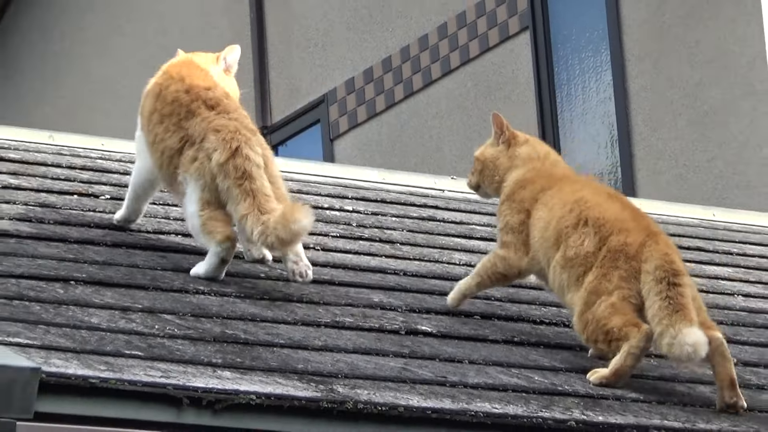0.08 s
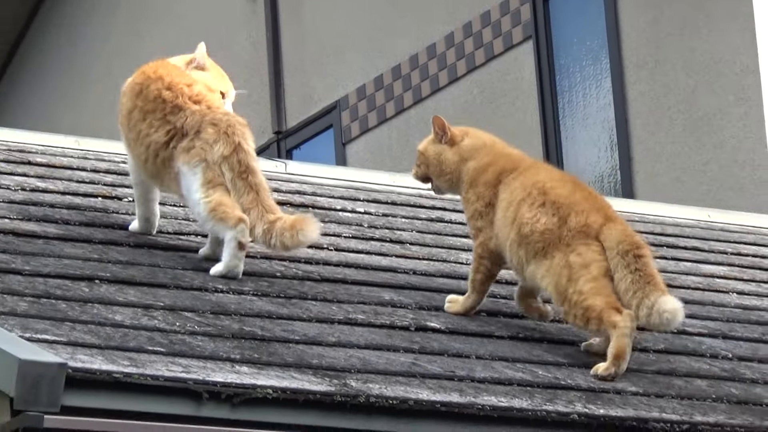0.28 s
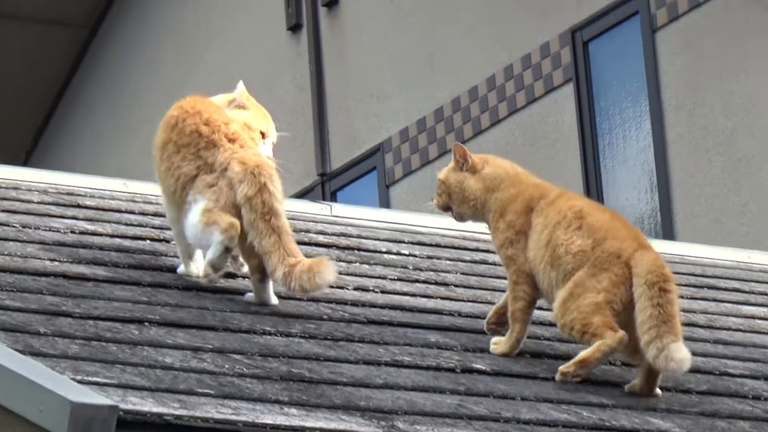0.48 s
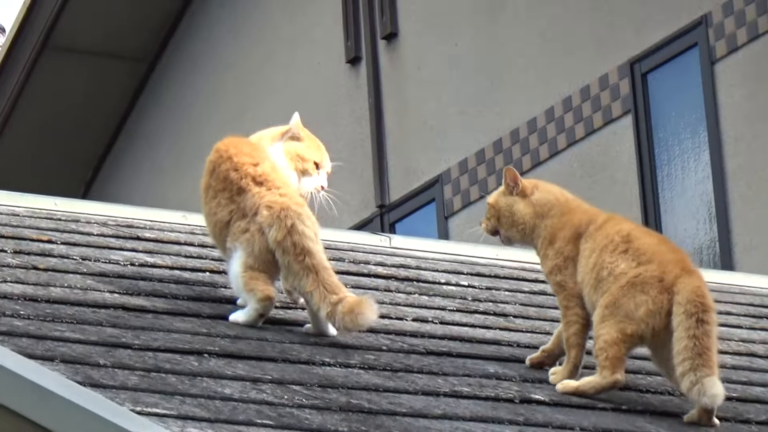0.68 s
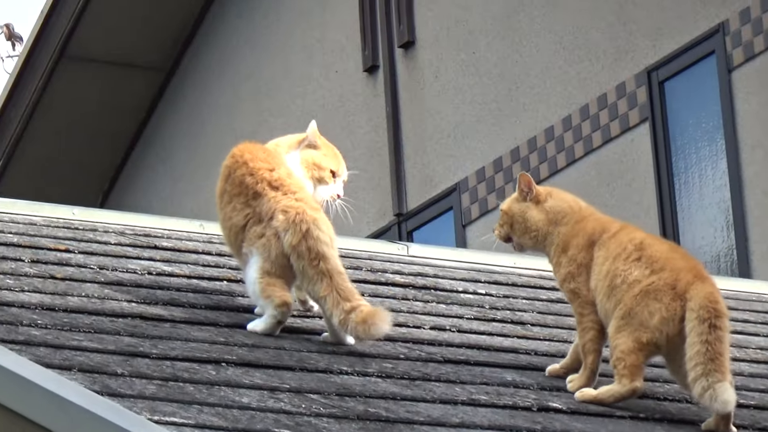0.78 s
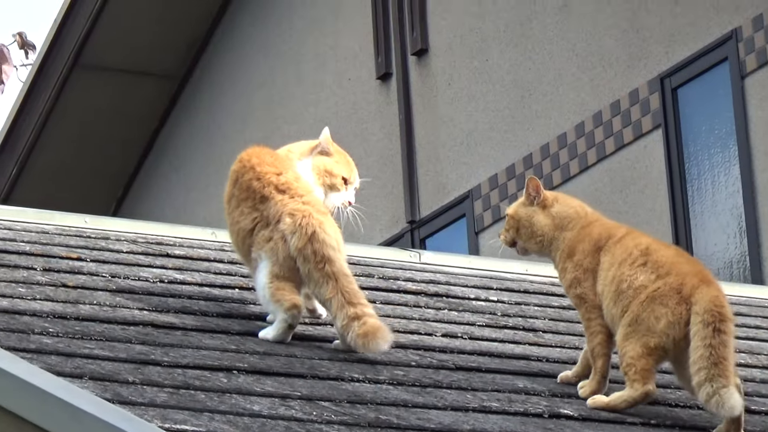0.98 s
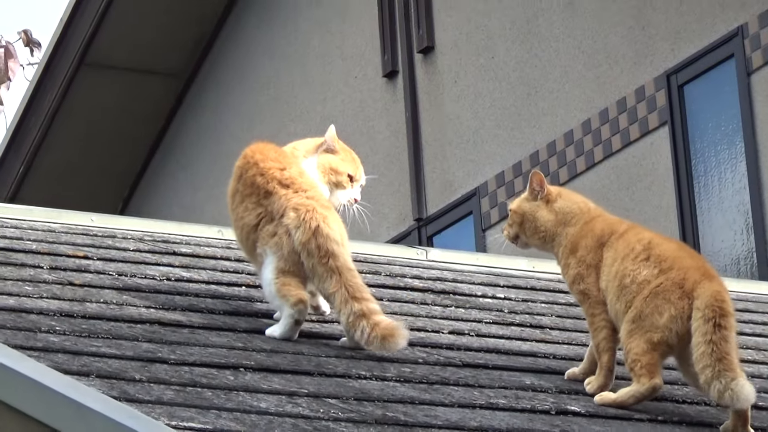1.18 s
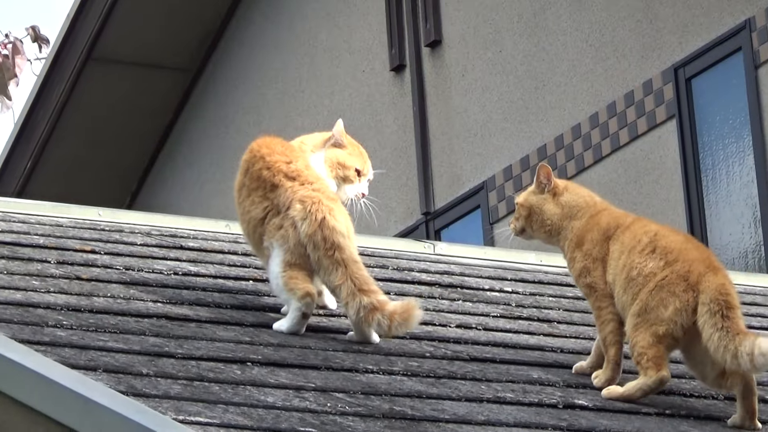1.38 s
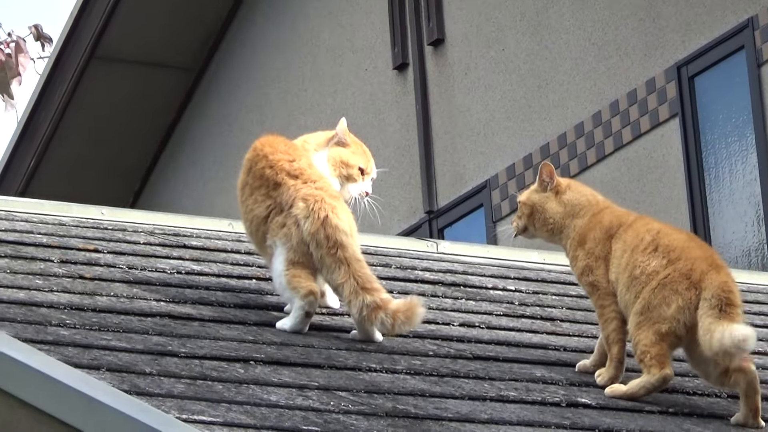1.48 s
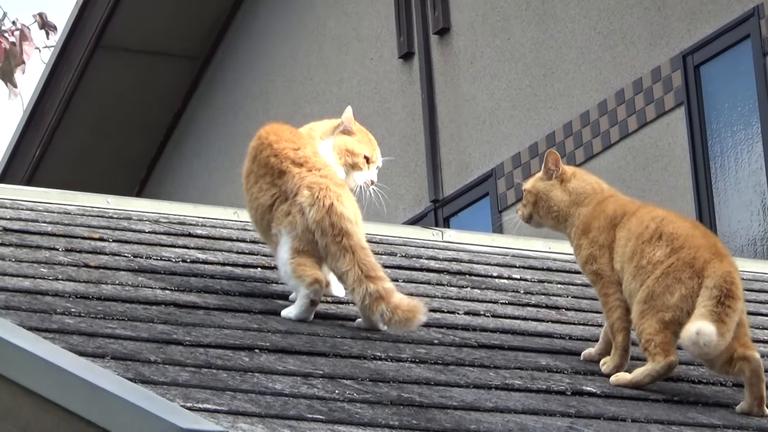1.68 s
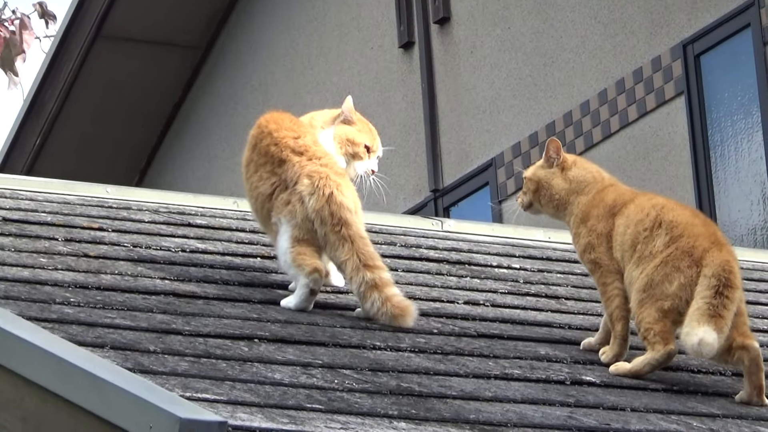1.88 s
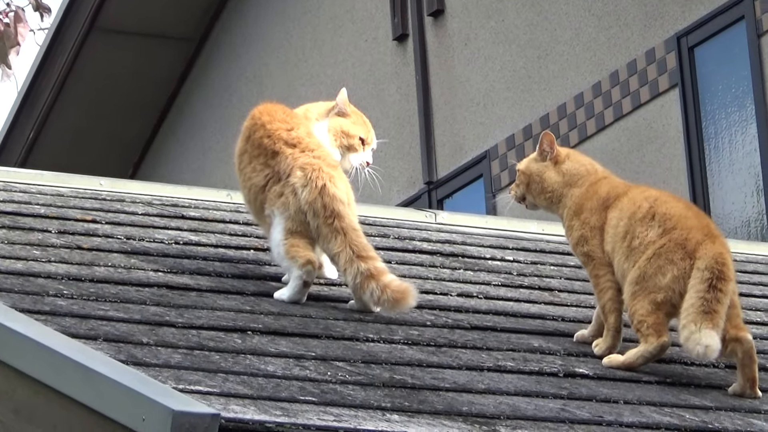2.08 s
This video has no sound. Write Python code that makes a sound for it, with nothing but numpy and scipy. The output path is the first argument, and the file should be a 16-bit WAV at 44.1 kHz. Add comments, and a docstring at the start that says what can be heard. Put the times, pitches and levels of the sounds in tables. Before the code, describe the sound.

A cat yowls once, loud and nasal, leaping up from a rough start, holding steady, then sagging to a brief hum. A faint claw tick precedes it; roof and wall echo it over quiet town murmur.

```python
"""A cat on a tiled roof yowls once at a rival: a harmonic series shaped by throat and mouth resonances.
The pitch leaps up, holds and sags as the mouth closes; a closed-mouth hum ends the call.
A second tone and a noise rasp join its rough start; a claw, a short noise burst, ticks on a tile before it.
Discrete reflections and a diffuse tail echo all of this off roof, wall and yard.
Behind, unechoed: shaped noise for the town's murmur, far traffic and a soft high rustle."""
import sys
import numpy as np
from scipy import signal
from scipy.fft import rfft, irfft
from scipy.io import wavfile

SR = 44100
rng = np.random.default_rng(int(sys.argv[2]) if len(sys.argv) > 2 else 0)


def generate_wav(signal):
    """Clip the signal to [-1, 1] and save it as 16-bit WAV at the path in sys.argv[1]."""
    frames = np.transpose(np.atleast_2d(signal))
    scaled = np.clip(frames, -1, 1) * 32767
    pcm = np.round(scaled).astype(np.int16)
    wavfile.write(sys.argv[1], SR, pcm)


N = 92610


def amp(db):
    """Decibels to gain."""
    return 10 ** (np.asarray(db) / 20)


def unit(x):
    """Scale to rms 1."""
    return x / np.sqrt(np.mean(x ** 2))


def curves(table):
    """Each column after time_s, joined by straight lines in time."""
    time_s, *columns = np.array(table, float).T
    return [np.interp(np.arange(N) / SR, time_s, column) for column in columns]


def colour(table, hz):
    """Second column of a table, read on a log-frequency axis."""
    table_hz, level_db = np.array(table, float).T
    return np.interp(np.log(hz + 1), np.log(table_hz), level_db)


def noise(gain):
    """Noise with a gain for each frequency, rms 1."""
    spectrum = rfft(rng.standard_normal(N))
    return unit(irfft(spectrum * gain(np.fft.rfftfreq(N, 1 / SR)), N))


def resonant(bands):
    """Noise through parallel resonances, rms 1; band levels are relative."""
    def gain(f):
        return sum(amp(level_db) / np.sqrt(width_hz) / (1 + ((f - centre_hz) / width_hz * 2) ** 2)
                   for centre_hz, width_hz, level_db in bands)
    return noise(gain)


def walk(rate_hz):
    """Smooth random motion up to about rate_hz, rms 1."""
    return noise(lambda f: 1 / (1 + (f / rate_hz) ** 4))


def gate(table, attack_s=0.015, release_s=0.012):
    """Opens from a table's first time, closes after its last."""
    t = np.arange(N) / SR
    opening = np.clip((t - table[0][0]) / attack_s, 0, 1)
    closing = np.clip(1 - (t - table[-1][0]) / release_s, 0, 1)
    return opening * closing


def spread(mid, side, width):
    """Left and right from a shared and an opposed part."""
    return mid + width * side * np.array([[1], [-1]])


# vocal folds: time_s, pitch_hz
FOLD_PITCH = [(.17, 355), (.19, 413), (.21, 525), (.235, 607.6), (.26, 676.6), (.3, 732), (.345, 761.8),
              (.385, 781.3), (.42, 769.7), (.48, 778.9), (.53, 779.9), (.61, 771), (.69, 766.8), (.76, 753),
              (.84, 731), (.92, 711.3), (1.025, 698.7), (1.055, 689.3), (1.11, 688.5), (1.18, 664),
              (1.2, 655.6), (1.22, 653), (1.25, 622.6), (1.285, 593.6), (1.3, 586.5)]
# fold unsteadiness: time_s, roughness (0-1)
FOLD_ROUGHNESS = [(.17, .45), (.28, .35), (.38, .1), (.5, .04), (1.15, .04), (1.3, .12)]
# fold harmonics from the fundamental up: strength_db
FOLD_HARMONICS = [2.5, 4, 3.5, 1.5, -11.5, -1, -5.5, -2, -3.5, 0, -7, 0.5, -13, 1.5, -2, 0, -5, 1]
# fixed throat colour: freq_hz, level_db
THROAT_COLOUR = [(400, -8), (750, -4), (1100, 0), (1500, 0), (2300, -10), (3000, -9), (3600, -18),
                 (4150, -17), (4650, -12), (5200, -19), (6500, -20), (8500, -26), (11000, -29),
                 (12500, -34), (14000, -44)]
# effort and mouth: time_s, level_db, lower_hz, upper_hz, top_hz, treble_db
MOUTH_SHAPE = [(.172, -60, 1420, 2080, 7560, 19), (.198, -41.5, 1605, 2170, 7600, -8.5),
               (.235, -35.5, 1820, 2800, 7500, -6), (.28, -31, 2028, 2530, 7500, -3.5),
               (.325, -32.5, 2170, 2470, 7500, 0), (.37, -31, 2178, 2600, 9250, -0.5),
               (.45, -29, 2194, 2690, 9730, 2), (.56, -30, 1988, 2480, 10150, 2),
               (.7, -28.5, 1970, 2730, 9580, 3), (.82, -27.5, 1962, 2690, 9240, -0.5),
               (.94, -31, 1656, 2800, 8600, 1), (1.1, -31.5, 1610, 2645, 8280, 0.5),
               (1.2, -36.5, 1400, 2650, 8000, 2.5), (1.275, -38, 1210, 2450, 7700, 0.5),
               (1.3, -41, 1160, 2386, 7540, 1)]
LOWER_WIDTH_HZ, UPPER_WIDTH_HZ, TOP_WIDTH_HZ = 224, 221, 226
LOWER_PEAK_DB, UPPER_PEAK_DB, TOP_PEAK_DB = 15.5, 10, 8.5
WAVER, JITTER = 0.00076, 0.0067  # rms fractions of pitch; jitter at roughness 1
SHIMMER = 0.21  # rms fraction of amplitude at roughness 1
AIR_DB = -24.5


def yowl():
    """Fold harmonics filtered by throat and three moving mouth resonances, plus air pulsed once a cycle."""
    (pitch_hz,), (roughness,) = curves(FOLD_PITCH), curves(FOLD_ROUGHNESS)
    level_db, lower_hz, upper_hz, top_hz, treble_db = curves(MOUTH_SHAPE)
    unsteadiness = WAVER * walk(22) + JITTER * roughness * walk(230)
    phase = 2 * np.pi * np.cumsum(pitch_hz * (1 + unsteadiness)) / SR
    resonances = [(lower_hz, LOWER_WIDTH_HZ, LOWER_PEAK_DB),
                  (upper_hz, UPPER_WIDTH_HZ, UPPER_PEAK_DB),
                  (top_hz, TOP_WIDTH_HZ, TOP_PEAK_DB)]
    voice = np.zeros(N)
    for k, strength_db in enumerate(FOLD_HARMONICS, 1):
        hz = k * pitch_hz
        mouth_db = sum(peak_db / (1 + ((hz - centre_hz) / width_hz) ** 2)
                       for centre_hz, width_hz, peak_db in resonances)
        treble_share = np.clip((hz - 3000) / 1500, 0, 1)
        flicker_db = treble_share * (treble_db + 2 * walk(9.3))
        harmonic_db = strength_db + colour(THROAT_COLOUR, hz) + mouth_db + flicker_db
        voice += amp(harmonic_db) * np.sin(k * phase)
    air_bands = [(940, 250, -16.5), (1900, 350, -2), (2740, 240, -6)]  # centre_hz, width_hz, level_db
    air = amp(AIR_DB) * resonant(air_bands) * (1 + np.cos(phase))
    shimmer = 1 + SHIMMER * roughness * walk(320)
    return (voice * shimmer + air) * amp(level_db) * gate(MOUTH_SHAPE)


# breathy rasp as the mouth opens: time_s, level_db
RASP_LEVEL = [(.17, -70), (.21, -60.5), (.26, -50.5), (.31, -53), (.37, -76)]
# rasp resonances: centre_hz, width_hz, level_db
RASP_RESONANCES = [(3800, 1100, -6), (6000, 620, -6), (7860, 850, -4), (11800, 700, -19)]


def rasp():
    """Turbulence in the open mouth at the start of the call: resonant noise."""
    (level_db,) = curves(RASP_LEVEL)
    return amp(level_db + 2 * walk(70)) * gate(RASP_LEVEL) * resonant(RASP_RESONANCES)


def tone(table, waver, flutter, octave_db):
    """Unsteady sine and its octave; waver and flutter are rms fractions of pitch and amplitude."""
    pitch_hz, level_db = curves(table)
    phase = 2 * np.pi * np.cumsum(pitch_hz * (1 + waver * walk(68))) / SR
    wave = np.sin(phase) + amp(octave_db) * np.sin(2 * phase)
    return amp(level_db) * gate(table) * (1 + flutter * walk(90)) * wave


# second tone: time_s, pitch_hz, level_db
SECOND_PITCH_LEVEL = [(.155, 873, -54), (.195, 865, -37), (.215, 879, -21), (.238, 879, -19),
                      (.27, 890.4, -25), (.32, 862.5, -27.5), (.38, 886, -36), (.46, 826, -46)]


def second_tone():
    """Nearly pure tone beside the rough start of the yowl."""
    return tone(SECOND_PITCH_LEVEL, waver=0.0218, flutter=0.19, octave_db=-41)


# closed-mouth hum: time_s, pitch_hz, level_db
HUM_PITCH_LEVEL = [(1.29, 608.3, -48), (1.35, 583.6, -38), (1.38, 574, -50.5), (1.42, 544, -52.5)]


def hum():
    """The call dies away with the mouth closed: fundamental and strong octave."""
    return tone(HUM_PITCH_LEVEL, waver=0.012, flutter=0.3, octave_db=-1)


# tile ring: centre_hz, width_hz, level_db
TILE_RESONANCES = [(2450, 700, -3), (3450, 300, 0), (4900, 300, -6), (5500, 3000, -10)]
CLAW_START_S, CLAW_HOLD_S, CLAW_DECAY_S = 0.0322, 0.005, 0.003
CLAW_DB = -44


def claw():
    """A claw catches on a tile and drags for an instant: resonant noise, held, then decaying."""
    age_s = np.arange(N) / SR - CLAW_START_S
    decay = np.exp(-np.maximum(age_s - CLAW_HOLD_S, 0) / CLAW_DECAY_S)
    return amp(CLAW_DB) * resonant(TILE_RESONANCES) * (age_s > 0) * decay


# reflections off roof and wall: delay_s, left_db, right_db
REFLECTIONS = [(.0088, -14.5, -17.5), (.01977, -20, -18.5), (.03768, -17, -17.5)]
# diffuse yard echo: centre_hz, level_db, t60_s
DIFFUSE_ECHO = [(400, -0.5, 0.27), (765, -12, 0.62), (1350, -11, 0.44), (2600, -4, 0.39), (4000, -6.5, 0.6),
                (7800, -10, 0.083), (14000, -37, 0.17)]
DIFFUSE_WIDTH = 0.64
PAN_DB = -0.4  # direct sound, left minus right


def yard(x):
    """Direct sound, distinct reflections and a diffuse noise tail with a decay time per band."""
    t, f = np.arange(N) / SR, np.fft.rfftfreq(N, 1 / SR)
    tail_noise = spread(rng.standard_normal(N), rng.standard_normal(N), DIFFUSE_WIDTH)
    tail_spectrum = rfft(tail_noise) / np.hypot(1, DIFFUSE_WIDTH)
    build = np.clip((t - 0.006) / 0.024, 0, 1)
    log_centres = np.log([row[0] for row in DIFFUSE_ECHO])
    response = np.zeros((2, N))
    # each row of the identity makes one crossfaded band
    for (_, level_db, t60_s), share in zip(DIFFUSE_ECHO, np.eye(len(DIFFUSE_ECHO))):
        fade = build * np.exp(-np.log(1000) * t / t60_s)
        band = np.interp(np.log(f + 1), log_centres, share)
        response += amp(level_db) * irfft(tail_spectrum * band, N) * fade / np.sqrt(np.sum(fade ** 2))
    response[:, 0] += amp([PAN_DB / 2, -PAN_DB / 2])
    for delay_s, left_db, right_db in REFLECTIONS:
        response[:, int(round(delay_s * SR))] += amp([left_db, right_db])
    return signal.fftconvolve(x[None], response, axes=1)[:, :N]


# far traffic: time_s, drone_db, rush_db
TRAFFIC_LEVEL = [(0, -56.5, -72), (.5, -59.5, -62), (1, -54.5, -71), (1.4, -51, -57), (1.58, -47, -55),
                 (1.73, -53.5, -49.5), (1.92, -52, -56), (2.1, -59.5, -58)]
# drone resonances: centre_hz, width_hz, level_db
DRONE_RESONANCES = [(155.8, 24, -2), (233.2, 33, -1.5), (279.5, 65, -6.5)]
# rush resonances: centre_hz, width_hz, level_db
RUSH_RESONANCES = [(770, 570, 1.5), (1113, 210, -0.5), (1490, 123, -8)]


def traffic():
    """Far traffic: a low noise drone, fluctuating in level, and a wider, higher rush."""
    drone_db, rush_db = curves(TRAFFIC_LEVEL)
    drone = spread(resonant(DRONE_RESONANCES), resonant(DRONE_RESONANCES), 0.06)
    rush = spread(resonant(RUSH_RESONANCES), resonant(RUSH_RESONANCES), 0.44)
    return amp(drone_db + 0.67 * walk(24)) * drone + amp(rush_db) * rush


# town spectrum: freq_hz, density_db (relative, per Hz)
TOWN_COLOUR = [(20, -15), (40, -16), (90, -8), (140, -9.5), (250, -11), (430, -11.5), (700, -14),
               (1100, -15.5), (2300, -21.5), (5000, -27.5), (9000, -28), (11000, -32.5), (13000, -37),
               (15500, -38)]
# murmur swell: time_s, level_db
MURMUR_SWELL = [(0, -0.5), (.13, -2), (.5, 1.5), (1.2, 2), (1.6, 1.5), (2.1, 0)]
TOWN_DB = -52.5


def town():
    """Outdoor murmur: coloured noise, swelling slightly, stereo mainly in the middle band."""
    (swell_db,) = curves(MURMUR_SWELL)

    def mid_gain(f):
        return amp(colour(TOWN_COLOUR, f))

    def side_gain(f):
        return mid_gain(f) / (1 + (170 / (f + 1)) ** 3) / (1 + (f / 7000) ** 6)

    return amp(TOWN_DB + swell_db) * spread(noise(mid_gain), noise(side_gain), 0.33)


# high rustle: time_s, level_db
RUSTLE_LEVEL = [(0, -70), (.15, -76), (1.3, -72), (1.4, -62), (1.5, -68), (1.62, -64), (1.78, -67),
                (1.92, -62), (2.1, -66)]


def rustle():
    """Soft high rustle: treble noise, fluctuating in level."""
    (level_db,) = curves(RUSTLE_LEVEL)
    hiss = noise(lambda f: f / (f + 6000) / (1 + (f / 10500) ** 12))
    return amp(level_db + 1.1 * walk(15)) * hiss


def scene():
    """Cat and claw echoed by the yard, over the town."""
    on_roof = yowl() + rasp() + second_tone() + hum() + claw()
    return yard(on_roof) + traffic() + town() + rustle()


def record(dry):
    """The recorder cuts the top: steep elliptic low-pass at 15900 Hz."""
    return signal.sosfilt(signal.ellip(10, 0.1, 80, 15900, fs=SR, output="sos"), dry)


dry = scene()
out = record(dry)
generate_wav(out)
```